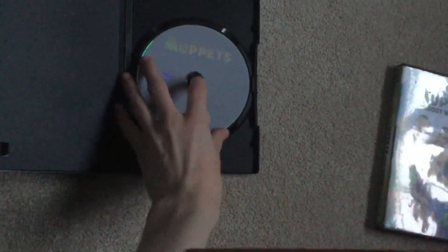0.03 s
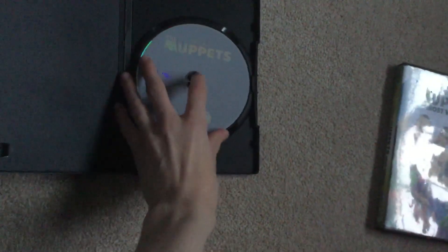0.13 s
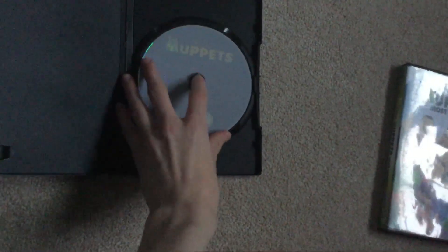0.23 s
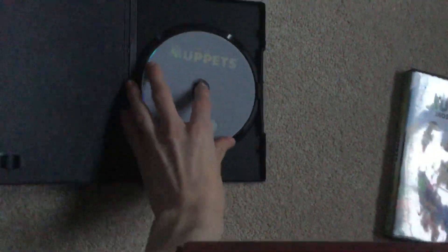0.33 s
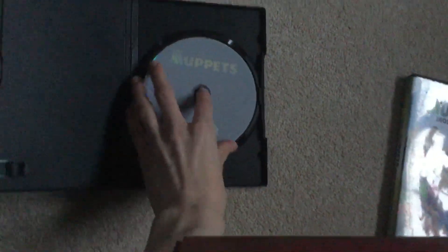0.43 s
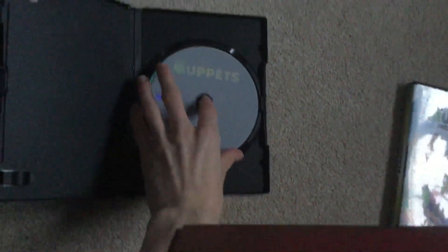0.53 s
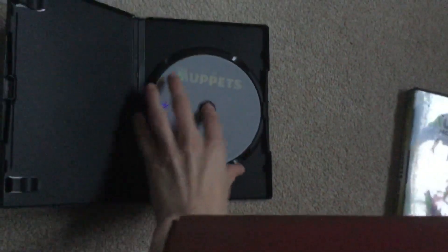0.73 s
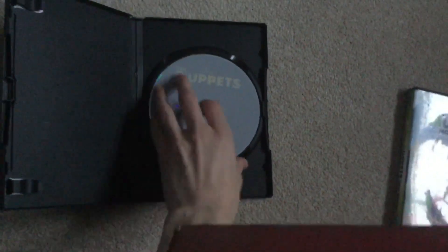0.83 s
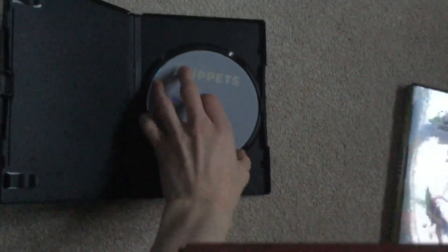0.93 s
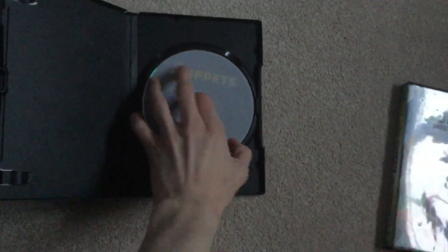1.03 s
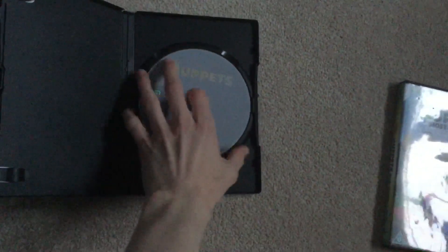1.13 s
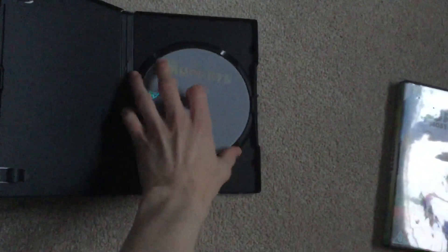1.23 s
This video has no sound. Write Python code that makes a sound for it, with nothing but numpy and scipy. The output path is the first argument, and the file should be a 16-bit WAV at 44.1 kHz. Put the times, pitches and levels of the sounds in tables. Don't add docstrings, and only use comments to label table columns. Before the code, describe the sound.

Plastic snaps of a disc being freed from its case hub: a quick cluster of clicks, then a louder crack with rattle, then faint ticks and creaks, close in a quiet carpeted room with low hum.

```python
import sys
import numpy as np
from scipy import signal
from scipy.fft import rfft, irfft, next_fast_len
from scipy.io import wavfile
from scipy.ndimage import map_coordinates

SR = 44100
rng = np.random.default_rng(int(sys.argv[2]) if len(sys.argv) > 2 else 0)


def put_to_file(sound):
    columns = np.atleast_2d(sound).T
    safe = np.clip(columns, -1, 1)
    whole_steps = np.round(safe * 32767)
    wavfile.write(sys.argv[1], SR, whole_steps.astype(np.int16))


def voltage_ratio(decibels):
    exponent = np.asarray(decibels, float) / 20
    return 10 ** exponent


N = 57330

# frequency in Hz, density in dB per Hz.
RUB = [(100, -30), (300, -8.5), (600, -6), (1000, -1.5), (2300, 0), (3300, -9), (4800, -11), (9500, -27)]
# frequency in Hz, density in dB.
SHEEN = [(3000, -22.5), (4800, -8), (7000, -6.5), (10500, -9), (13000, 0), (15500, -4.5), (17000, -10)]


def clicks():
    # start in seconds, peak in dB, pitch in Hz, crack in dB, weight in dB.
    snaps = [(0.1430, -29.5, 1516, -22.5, -9.5), (0.2180, -32.5, 2224, -18, -10.5),
             (0.2317, -11, 1900, -15, -12), (0.2439, -7.5, 2260, -9, -11), (0.2549, -9, 2095, -17, -12.5),
             (0.3633, 1, 1900, -16, -30), (0.3652, -8.5, 2900, -9, -25), (0.3782, -14.5, 2100, -24, -12.5),
             (0.7922, -30, 1195, -31, -16), (0.8097, -20.5, 1918, -19, -19),
             (1.0256, -33.5, 1750, -24, -23), (1.1361, -11, 2145, -28, -23), (1.1726, -26, 1654, -17, -8.5),
             (1.2812, -25.5, 1096, -30, -22.5)]
    # start in seconds, peak in dB, pitch in Hz, crack in dB.
    ticks = [(0.002, -45, 774, -34.5), (0.147, -33, 1341, -19.5), (0.176, -45, 2199, -24),
             (0.2595, -18, 2463, -16), (0.3574, -23, 2680, -30.5), (0.3601, -18.5, 2600, -33.5),
             (0.3875, -19.5, 2200, -19.5), (0.3912, -23.5, 1976, -20.5), (0.3985, -16, 2020, -18),
             (0.4024, -21, 1858, -21), (0.607, -39.5, 1705, -35), (0.622, -43.5, 1030, -28),
             (0.754, -54, 950, 0), (0.773, -36, 1827, -30), (0.800, -44, 1500, -24),
             (0.8134, -33.5, 1847, -21), (1.0272, -35.5, 1824, -24), (1.093, -44.5, 2090, -29.5),
             (1.107, -43.5, 1400, -28), (1.1825, -31.5, 2160, -24), (1.197, -33, 1540, -24),
             (1.248, -48, 1621, -22), (0.3554, -35, 6770, -30), (0.36, -25, 6680, -30),
             (0.1448, -38.5, 4192, -25), (1.022, -44, 4320, 0)]
    # frequency in Hz, level in dB, T60 in seconds.
    shell_modes = [(350, -33, .04), (981.4, -30.5, .08), (1340.4, -21.5, .03), (1616.6, -25, .03),
                   (1843, -22.5, .035), (2195, -21.5, .03), (2449.4, -22.5, .03), (2900, -20.5, 0.012),
                   (3886, -28, 0.039), (4488, -28, 0.0088), (5677, -32, .012), (6730, -30.5, 0.015)]
    tick_weight_db = -21
    grip_detune, mode_scatter_db = 0.04, 4

    out = np.zeros(N + SR)
    t = np.arange(SR // 10) / SR
    for start, db, hz, crack_db, weight_db in [*snaps, *[(*tick, tick_weight_db) for tick in ticks]]:
        knock = -ring(t, hz, t60=0.0085)
        shell = np.zeros(len(t))
        for mode_hz, mode_db, t60 in shell_modes:
            level = voltage_ratio(mode_db + mode_scatter_db * rng.normal()) * np.sign(rng.normal())
            shell += level * ring(t, mode_hz * (1 + grip_detune * rng.normal()), t60)
        crack = voltage_ratio(crack_db) * burst(t, SHEEN, t60=0.01)
        scuff = voltage_ratio(weight_db - 0.5) * burst(t, RUB, t60=0.033)
        thump = voltage_ratio(weight_db - 6.5) * ring(t, 280 * (1 + 0.2 * rng.normal()), t60=0.035)
        out[round(start * SR):][:len(t)] += voltage_ratio(db) * (knock + shell + crack + scuff + thump)
    return out[:N]


def ring(t, hz, t60):
    onset = 1 - np.exp(-t / 0.0003)
    return voltage_ratio(-60 * t / t60) * np.sin(2 * np.pi * hz * t) * onset


def burst(t, colour, t60):
    noise = filtered(rng.standard_normal(len(t)), lambda f: voltage_ratio(along(colour, f)))
    return unit(noise) * voltage_ratio(-60 * t / t60)


def creaks():
    # start in seconds, rise in seconds, fall in seconds per 20 dB
    # (negative swells), level in dB, fizz in dB.
    rubs = [(0.0, .002, 0.0023, -60, -24), (0.125, .022, 0.0487, -46, -28.5),
            (0.214, .008, 0.0192, -43.5, -24.5), (0.224, 0.0138, 0.047, -33, -16),
            (0.27, .035, 0.0165, -50.5, -3), (0.344, 0.01606, 0.0111, -36, -25),
            (0.374, .028, 0.0433, -30, -13.5), (0.6, .012, 0.0226, -58.5, -24.5), (0.6, .05, 0.28, -73, -6),
            (0.9, 0.0823, 0.2727, -68, -17), (0.75, 0.0272, 0.0862, -49.5, -33),
            (0.875, 0.0302, 0.0328, -64, -0.5), (1.0, .024, 0.0232, -51.5, -5),
            (1.085, .02, 0.08, -58, -20), (1.124, .011, 0.08, -48, -26), (1.169, .012, 0.0326, -39, -22),
            (1.255, 0.0263, -0.32, -50, -22)]
    # frequency in Hz, width in Hz, level in dB.
    body_modes = [(740, 220, -8), (988, 45, 3), (1400, 160, -1), (1900, 200, -1), (2408, 200, -4),
                  (2900, 200, -10), (3842, 100, -6), (5400, 200, -14), (6433, 150, -17.5)]
    ring_db = 3.5

    rings = np.zeros(N)
    for hz, width, db in body_modes:
        rings += voltage_ratio(db) * filtered(slips(), lambda f: peak(f, hz, width) * peak(f, hz, 3 * width))

    t = np.arange(N) / SR
    low, high = np.zeros(N), np.zeros(N)
    for start, rise, fall, db, fizz_db in rubs:
        swell = np.clip((t - start) / rise, 0, 1) ** 2
        shape = swell * voltage_ratio(db - 20 * np.maximum(t - start - rise, 0) / fall)
        low += shape
        high += voltage_ratio(fizz_db) * shape
    creak = unit(rough(RUB) + voltage_ratio(ring_db) * unit(rings))
    return low * creak + high * rough(SHEEN)


def slips():
    happens = rng.random(N) < 500 / SR
    size = voltage_ratio(2 * rng.exponential(size=N))
    return happens * size * rng.standard_normal(N)


def rough(colour):
    noise = rng.standard_normal(N) * voltage_ratio(2.5 * wobble(300))
    return unit(filtered(noise, lambda f: voltage_ratio(along(colour, f))))


def room(x):
    # frequency in Hz, T60 in seconds.
    decay = [(200, 0.22), (1500, 0.15), (5000, 0.25), (14000, 0.1)]
    lag_s = 0.006
    hz, t, z = signal.stft(rng.standard_normal(SR // 2), SR, nperseg=256)
    fade = voltage_ratio(-60 * t / along(decay, hz)[:, None])
    tail = signal.istft(z * fade, SR, nperseg=256)[1]
    delayed = np.pad(x, (round(lag_s * SR), 0))
    return signal.fftconvolve(delayed, tail / np.linalg.norm(tail))[:N]


def background():
    # frequency in Hz, level in dB rms.
    hum_lines = [
        (100.3, -50.5),
        (200.6, -76),
        (300.9, -72.5),
    ]
    # frequency in Hz, width in Hz.
    drone_modes = [(45, 20), (320, 100)]
    # frequency in Hz, density in dB per Hz.
    air_colour = [(28, -14), (42, 5.5), (110, 3.5), (300, -6.5), (520, -17.5), (1700, -19.5), (2500, -29),
                  (15500, -36.5)]
    sway_db, drift_rad = 1.91, 0.6

    t = np.arange(N) / SR
    hum = np.zeros(N)
    for hz, db in hum_lines:
        level = voltage_ratio(db + sway_db * wobble(24)) * np.sqrt(2)
        hum += level * np.sin(2 * np.pi * hz * t + drift_rad * wobble(6.9))
    drone = filtered(rng.standard_normal(N), lambda f: sum(peak(f, hz, w) ** 2 for hz, w in drone_modes))
    air = filtered(rng.standard_normal(N), lambda f: voltage_ratio(along(air_colour, f)))
    return hum + voltage_ratio(-71.5) * unit(drone) + voltage_ratio(-61 + 0.68 * wobble(6)) * unit(air)


def unit(x):
    return x / np.sqrt(np.mean(x ** 2) + 1e-20)


def along(points, hz):
    f, v = np.transpose(points)
    return np.interp(np.log(hz + 1), np.log(f + 1), v)


def wobble(rate):
    knots = rng.standard_normal(int(N * rate / SR) + 4)
    return map_coordinates(knots, [np.arange(N) * rate / SR])


def filtered(x, response):
    m = next_fast_len(len(x) + SR // 4)
    return irfft(rfft(x, m) * response(np.fft.rfftfreq(m, 1 / SR)), m)[:len(x)]


def peak(f, hz, width_hz):
    return 1j * f * width_hz / (hz * hz - f * f + 1j * f * width_hz)


def scene():
    case = clicks() + creaks()
    room_db = -15
    return (case + voltage_ratio(room_db) * room(case) + background())[None]


def band_limit(x):
    return signal.sosfilt(signal.butter(12, 16640, fs=SR, output="sos"), x)


def record(dry):
    low_cut_hz, top_hz, top_edge_hz = 23, 16500, 500

    def mic(hz):
        upper_edge = np.clip((top_hz - hz) / top_edge_hz, 0, 1)
        return (upper_edge * 1j * hz / (low_cut_hz + 1j * hz)) ** 2

    return band_limit(filtered(dry[0], mic)[None])


dry = scene()
out = record(dry)
put_to_file(out)
```